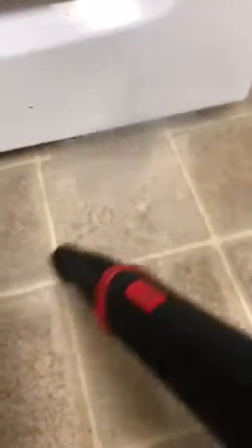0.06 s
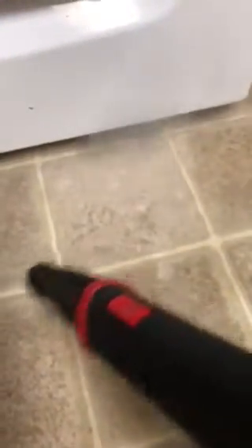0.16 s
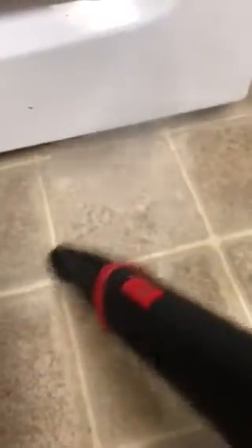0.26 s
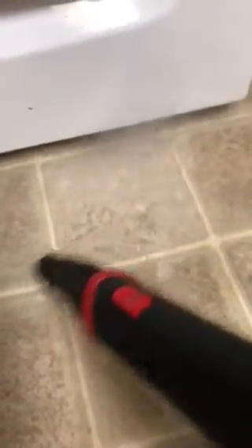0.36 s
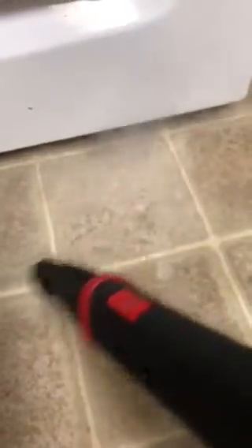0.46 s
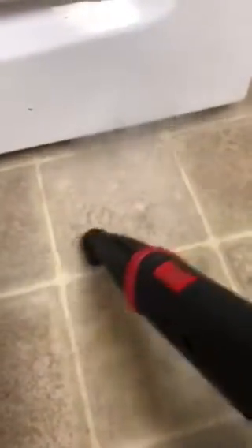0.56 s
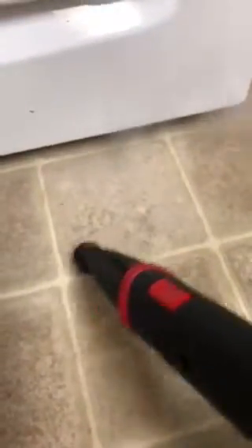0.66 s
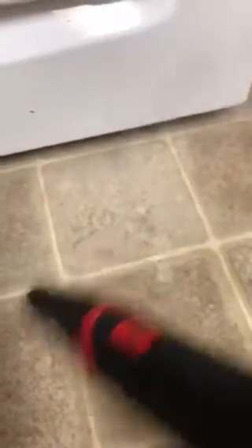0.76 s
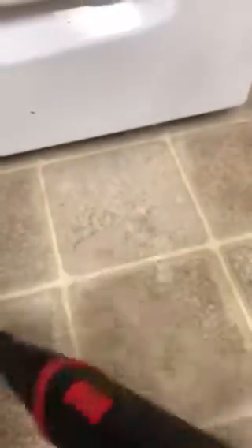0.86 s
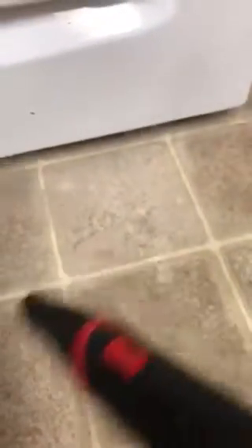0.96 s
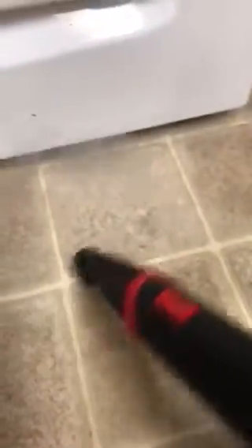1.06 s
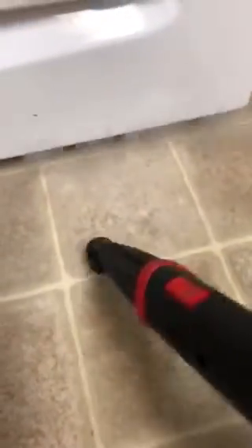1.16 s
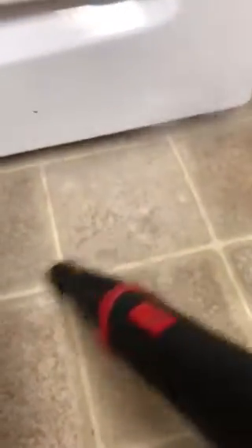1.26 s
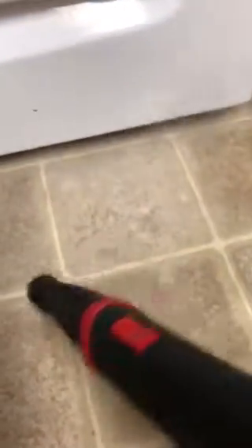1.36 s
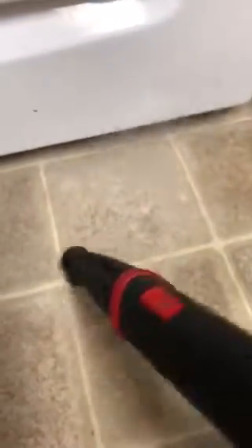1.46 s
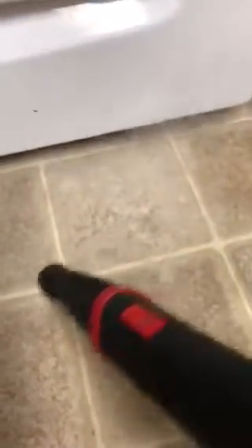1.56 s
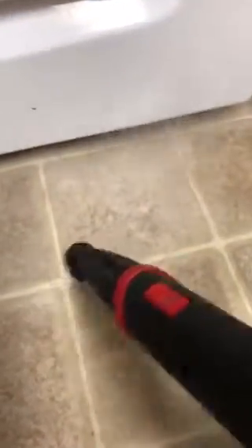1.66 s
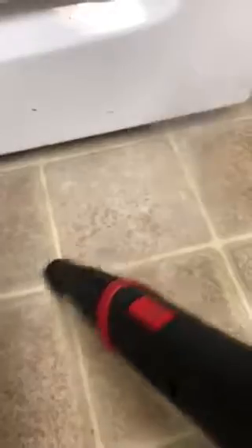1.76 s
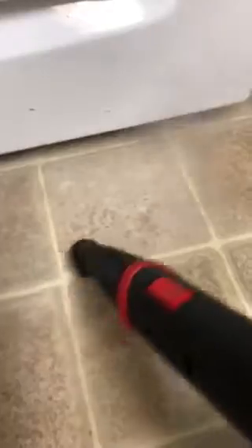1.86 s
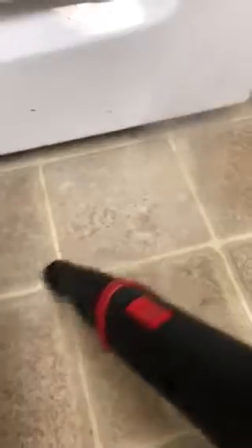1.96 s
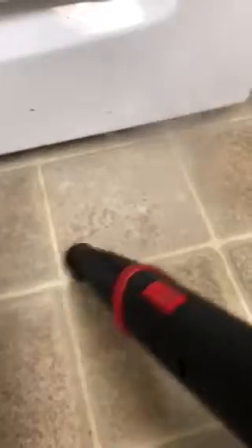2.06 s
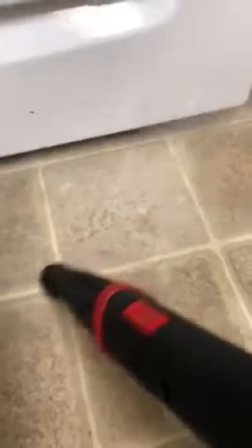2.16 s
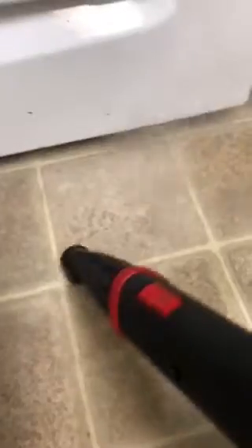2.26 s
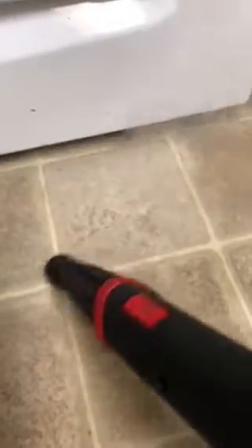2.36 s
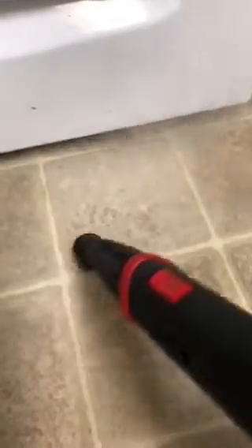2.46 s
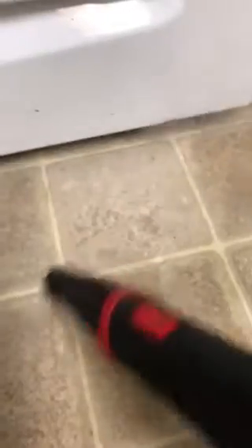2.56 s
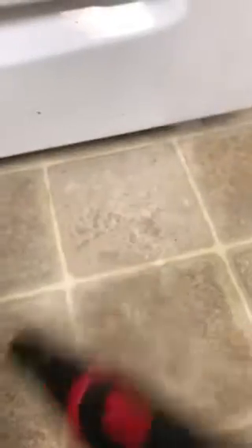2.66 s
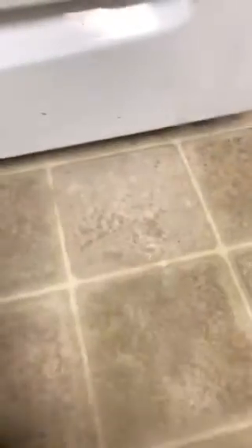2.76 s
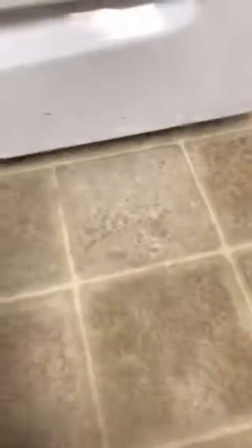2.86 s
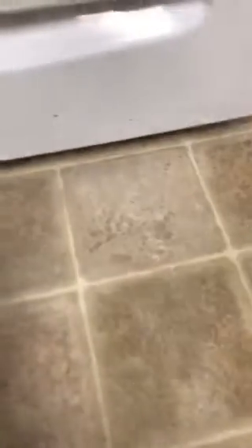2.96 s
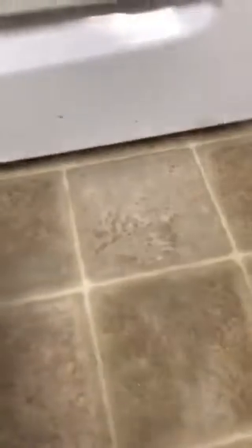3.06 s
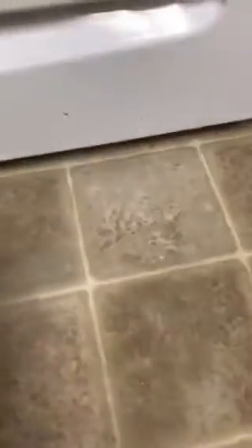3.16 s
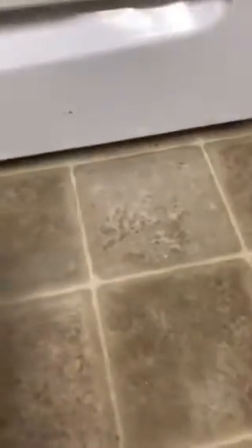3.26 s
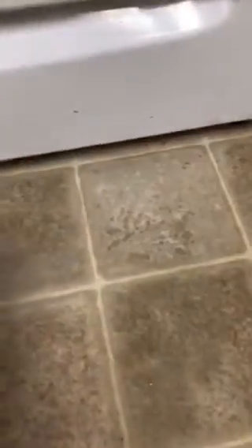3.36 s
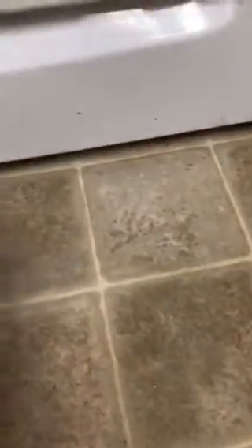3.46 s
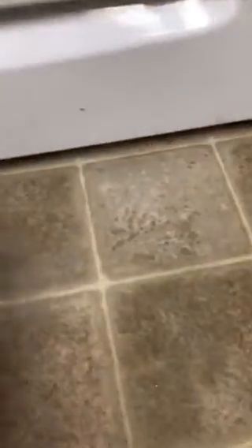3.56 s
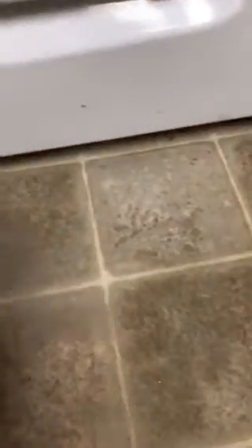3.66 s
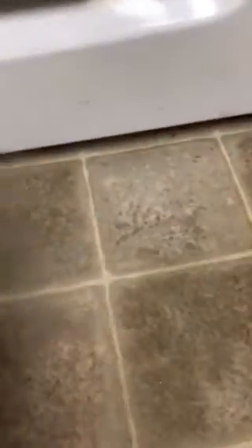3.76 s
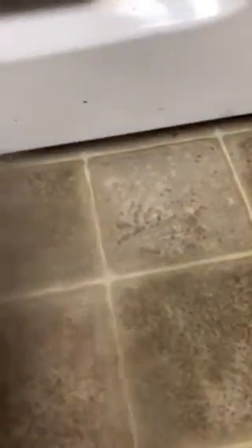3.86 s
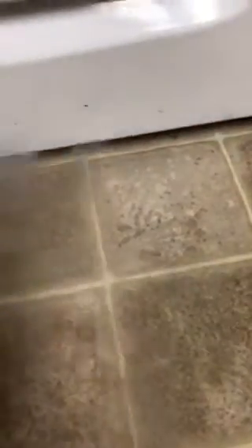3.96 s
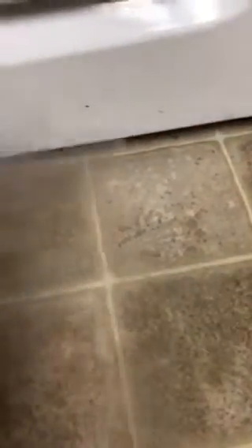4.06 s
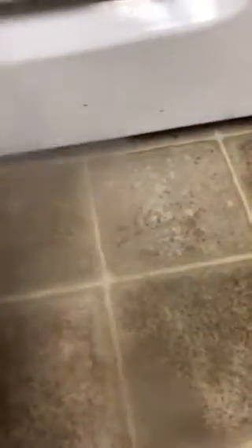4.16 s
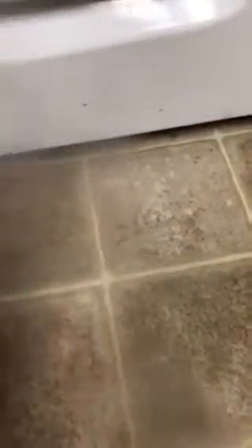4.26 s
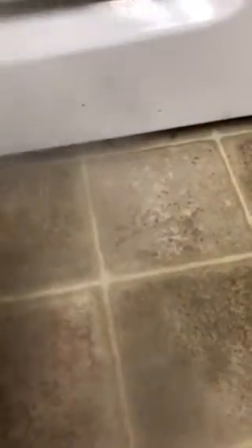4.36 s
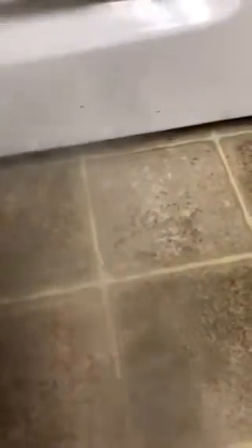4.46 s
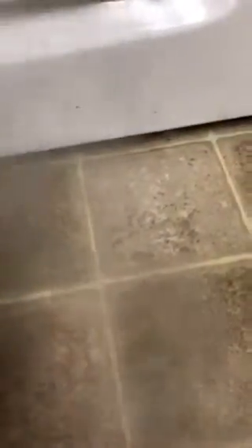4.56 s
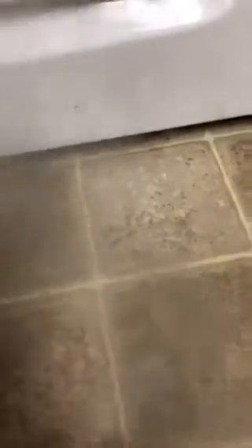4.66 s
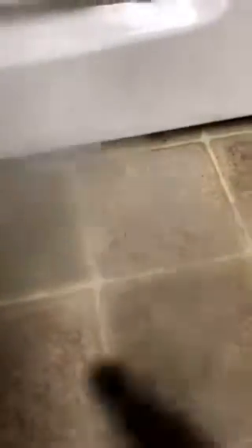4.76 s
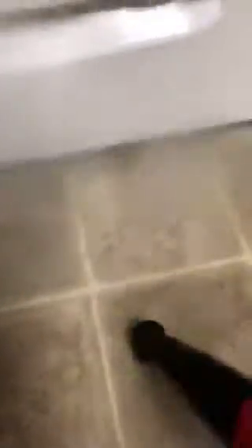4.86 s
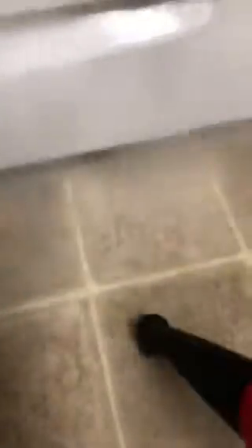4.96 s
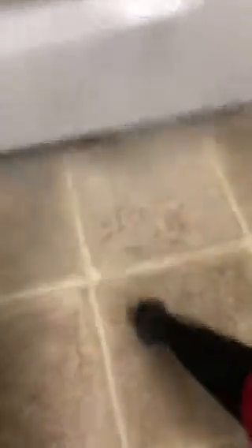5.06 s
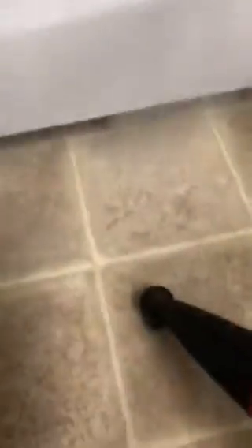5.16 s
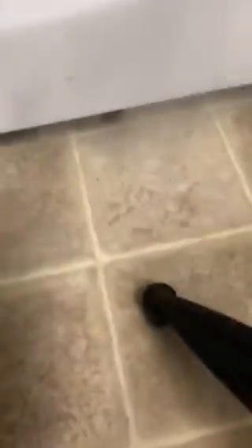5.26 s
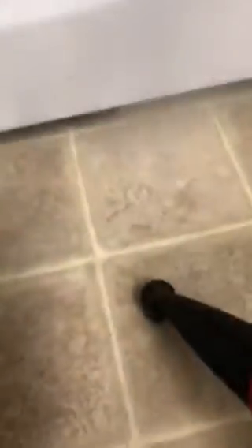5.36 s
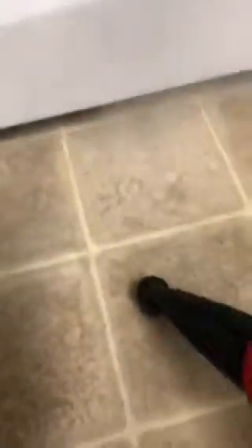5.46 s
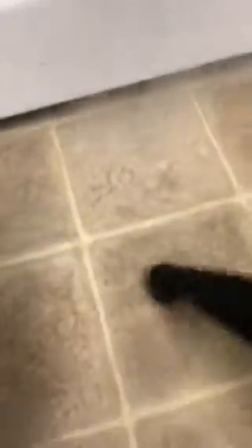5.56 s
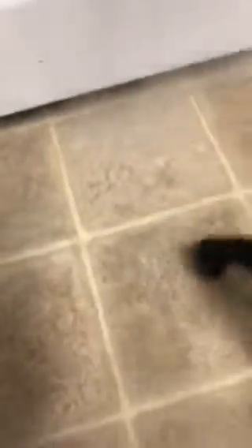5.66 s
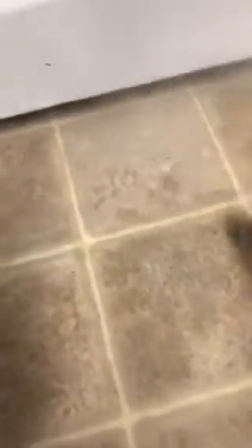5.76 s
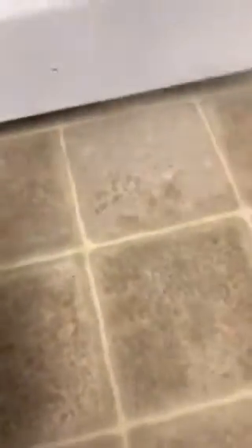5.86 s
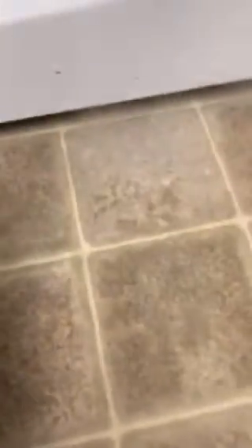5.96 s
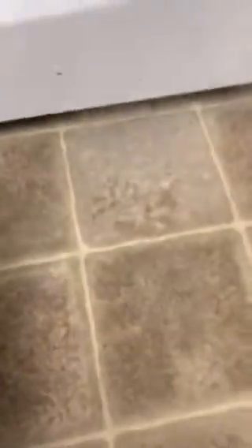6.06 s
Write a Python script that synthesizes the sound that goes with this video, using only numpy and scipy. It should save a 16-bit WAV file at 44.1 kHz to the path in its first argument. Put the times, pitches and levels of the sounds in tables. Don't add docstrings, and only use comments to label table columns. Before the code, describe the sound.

A handheld steam cleaner is already running, about half a metre from a phone microphone, in a small hard room with a tiled floor. Its loud, sharp hiss is strongest around 4 to 8 kHz, grainy with spitting droplets, with a slightly hollow, sliding comb colour from tile reflections. From 0 to 2.6 s it stays strong, with brief tiny dips as the wrist flicks; around 1.4 to 1.7 s it turns fuller, with a faint breathy resonance from the gap beneath the appliance. Near 2.7 s it swells, then drops back as the nozzle is lifted aside. From 3 to 4.7 s it is softer, with more pronounced fluttering dips. It surges back by 4.95 s and holds strong until about 5.7 s, then thins and rapidly dies away by 6.1 s. Quiet low wind-like buffeting and very faint mains hum sit underneath.

```python
import sys
import numpy as np
from scipy import signal
from scipy.fft import rfft, irfft, next_fast_len
from scipy.io import wavfile
from scipy.ndimage import uniform_filter1d, map_coordinates

SR = 44100
rng = np.random.default_rng(int(sys.argv[2]) if len(sys.argv) > 2 else 0)


def log_audio(samples):
    frames = np.atleast_2d(samples).T
    limited = np.clip(frames, -1, 1)
    pcm = np.round(limited * 32767).astype(np.int16)
    wavfile.write(sys.argv[1], SR, pcm)


def boost_factor(decibels):
    exponent = np.asarray(decibels, float) / 20
    return 10 ** exponent


N = 269653
TIME = np.arange(N) / SR
SIZE = next_fast_len(N, True)
BINS_HZ = np.fft.rfftfreq(SIZE, 1 / SR) + 1e-3

# start t/s, length t/s, dip level/dB
WAGS = [(.007, .021, 4), (0.228, 0.033, 3.5), (0.446, 0.022, 6), (0.762, 0.073, 1.5), (1.194, 0.024, 1),
        (1.323, 0.036, 2.5), (1.379, 0.026, 2.2), (1.612, 0.02, 3.7), (1.8, 0.026, 3), (1.978, 0.044, 3),
        (2.191, 0.019, 3.8), (2.316, 0.025, 1.5), (2.407, 0.047, 4.5), (2.602, 0.07, 3), (3.064, 0.15, 2),
        (3.428, 0.096, 5), (3.688, 0.089, 7), (3.912, 0.074, 7), (4.125, 0.079, 5.5), (4.225, 0.055, 2.5),
        (4.406, 0.06, 2), (4.314, 0.072, 6), (4.518, 0.064, 7), (4.61, 0.065, 1.5), (5.763, .028, 1.5),
        (6.009, 0.047, 0.5)]
# t/s, level/dB, aim at the gap [-1..1], fullness level/dB, treble beam level/dB
JET_AIM = [(0, -16, .2, -1, -0.5), (.75, -15.5, -0.14, -4.5, 1.5), (1.02, -15.5, 0.056, 2, -6.5),
           (1.28, -16.5, 0.16, -0.5, 2), (1.41, -17.5, 0.98, 5, -5), (1.72, -17, 0.75, 3, -2),
           (2.57, -15.5, -0.25, -3, 1), (2.71, -14, 0, -4.5, -9), (2.8, -18.5, -1.1, 2.5, 1.5),
           (3.3, -19, -0.15, 3.5, -1), (4.68, -20.5, -0.61, 2.5, 4), (4.82, -19, -.7, 5.5, 7.5),
           (4.95, -16, -0.8, -0.5, -2), (5.69, -15, 0.059, -2.5, -3), (5.81, -17, 0.34, -13, -2),
           (5.87, -16.5, -0.53, -15.5, -2.5), (5.96, -20.5, -1, -13, 0.5), (6.11, -27, -0.078, -10.5, -11)]
# f/Hz, level/dB per Hz
JET_COLOUR = [(290, -29), (500, -20.5), (537, -20), (781, -25), (1100, -18), (1650, -14), (1960, -13.5),
              (3070, -7.5), (4270, -2.5), (5000, -1.5), (5780, -1.5), (7600, -2.5), (10100, -5),
              (14500, -5), (15600, -5)]
AIM_HZ = [800, 1700, 3100, 4400, 6500, 10500, 14500]
# t/s, extra delay/ms, strength [0-1]
WAND_ECHO = [(0, .18, .12), (2.6, .18, .12), (3.0, .2, .05), (4.65, .18, .06), (4.85, .17, .26),
             (5.6, .165, .22), (5.67, .08, .1), (5.7, .085, .4), (5.755, .125, .33), (5.83, .25, .22),
             (5.9, .3, .15), (6.12, .35, .08)]
# t/s, extra delay by the tiles/ms, extra delay by a second bounce/ms, # second
HAND = [(0, .49, .86, .15, .35), (.55, .49, .86, .15, .35), (.7, .44, .87, .16, .3),
        (.9, .66, .96, .08, .2), (.98, .7, 1.0, .05, .15), (1.16, .485, .9, .14, .35),
        (1.26, .455, .88, .19, .55), (1.44, .52, .87, .19, .55), (1.56, .475, .87, .19, .55),
        (2.6, .465, .88, .2, .6), (2.68, .54, 1.1, .05, .3), (2.835, .95, 1.7, .07, .6),
        (3.28, 1.1, 2.0, .05, .9), (4.66, 1.06, 2.0, .1, .75), (4.94, .713, 1.52, .14, .4),
        (5.43, .715, 1.52, .13, .4), (5.78, .84, 1.65, .13, .3), (5.89, .63, 1.45, .08, .6)]
# extra delay/ms,
# strength [0-1]
TILE_MIRROR = [
    (.55, .36),
    (.72, .42),
    (.85, .32),
    (1.1, .19),
]
# t/s, level/dB
DRAUGHT = [(0, -46), (.25, -39.5), (.98, -41), (1.05, -49), (2.3, -44.5), (2.6, -38), (2.78, -50),
           (2.9, -43.5), (3.4, -42.5), (3.6, -41.5), (4.5, -41), (4.7, -43), (5.3, -46), (5.42, -44),
           (5.77, -36), (5.89, -56), (6.11, -50)]
# f/Hz, level/dB per Hz
DRAUGHT_COLOUR = [(15, -43), (25, -44), (54, -2.5), (81, 1.5), (292, 0.5), (479, -4.5), (533, -4),
                  (708, -5.5), (900, -4), (1170, -12), (1980, -120)]
# f/Hz, level/dB
HUM = [(300, -61), (360, -61.5), (540, -55), (600, -62)]
# t/s, low f/Hz, high f/Hz, level/dB
SPLITS = [(.571, 11000, 12400, -32), (1.964, 5200, 6320, -29), (1.964, 13100, 14500, -30),
          (3.055, 6900, 8300, -34), (3.264, 11700, 13800, -33), (4.1, 9000, 10400, -36),
          (5.749, 14500, 15700, -30)]

WAG_FALL_S, WAG_RISE_S, WAG_SETTLE_S = 0.0039, 0.011, 0.073
REACH_LATE_S, REACH_WIDTH_S, REACH_MS, REACH_MID_DB = .03, .04, .075, 3.5
DIP_MAIN, DIP_LOW, DIP_MID, DIP_TOP, SETTLE_TOP, DIP_DRAUGHT = 1.2, .75, .75, .7, .5, 2.2
DRAUGHT_KEEPS_DB = 4
LOW_DB, LOW_GAP_DB, LOW_PER_FULL = -2, 6, 0.42
FLICKER_DB, BILLOW_DB = .8, 1.1
ECHO_TOP_HZ, ECHO_LIFT = 9000, 1.25
ECHO_LOW_HZ, ECHO_LOW_SHARE = 3600, .45
CUPBOARD_MS, CUPBOARD_STRENGTH = 2.0, .06
ROOM_T60_S, ROOM_DB = 0.17, -12.5
GAP_HZ, GAP_WIDTH_HZ, GAP_DB, GAP_AIM_DB = 1643, 260, -46, 13.5
PORT_HZ, PORT_WIDTH_HZ, PORT_LIFT = 14300, 1900, .55
CEILING, TOP_HZ = .85, 15725


def curves(table):
    s, *columns = np.transpose(table)
    return [np.interp(TIME, s, column) for column in columns]


def unit(x):
    return x / np.sqrt(np.mean(x ** 2))


def walk(rate):
    hold = max(int(SR / rate), 2)
    levels = np.repeat(rng.standard_normal(N // hold + 1), hold)
    slewed = uniform_filter1d(uniform_filter1d(levels, hold), hold)
    return unit(slewed[:N])


def filtered(x, gain):
    return irfft(rfft(x, SIZE) * gain, SIZE)[:N]


def bands(x, colour, centres_hz):
    hz, db = np.transpose(colour)
    log_hz = np.log(BINS_HZ)
    x = unit(filtered(x, boost_factor(np.interp(log_hz, np.log(hz), db))))
    return [filtered(x, np.interp(log_hz, np.log(centres_hz), peak)) for peak in np.eye(len(centres_hz))]


def wags():
    t = TIME[::32]
    dip = settle = reach = 0
    for s, length, db in WAGS:
        fall = .5 + .5 * np.tanh((t - s) / WAG_FALL_S)
        after = t - s - length
        rise = .5 - .5 * np.tanh(after / WAG_RISE_S)
        dip = dip - db * fall * rise
        settle = settle - db * fall * np.exp(-np.maximum(after, 0) / WAG_SETTLE_S)
        reach = reach + min(db / 5, 1) * np.exp(-.5 * ((after - REACH_LATE_S) / REACH_WIDTH_S) ** 2)
    return [np.interp(TIME, t, trace) for trace in (dip, settle, reach)]


def jet(dip, settle, reach):
    spat = rng.random(N) < 900 / SR
    droplets = spat * rng.standard_normal(N) * boost_factor(1.83 * rng.exponential(size=N))
    turbulence = rng.standard_normal(N) * boost_factor(0.99 * walk(300) + .5 * walk(40))
    steam = turbulence + boost_factor(-9.0) * unit(droplets)

    flow_db, at_gap, full_db, beam_db = curves(JET_AIM)
    low = LOW_DB + LOW_GAP_DB * np.maximum(at_gap, 0) + LOW_PER_FULL * full_db + DIP_LOW * dip
    mid = full_db + DIP_MID * dip + REACH_MID_DB * reach
    main = DIP_MAIN * dip
    top = beam_db + DIP_TOP * dip + SETTLE_TOP * settle
    aim_db = np.array([1.26 * low, low, mid, 0.62 * mid + 0.77 * main, main, 0.18 * top + 0.57 * main, top])

    centres_hz = np.geomspace(600, 15000, num=16)
    out = 0
    for hz, band in zip(centres_hz, bands(steam, JET_COLOUR, centres_hz)):
        share = np.array([np.interp(np.log(hz), np.log(AIM_HZ), peak) for peak in np.eye(len(AIM_HZ))])
        out = out + band * boost_factor(share @ aim_db + FLICKER_DB * walk(9))
    return out * boost_factor(flow_db + 2.0)


def echo(x, ms, strength):
    return strength * map_coordinates(x, [np.arange(N) - ms * SR / 1000], order=3, mode="mirror")


def reflections(hiss, reach):
    tile_ms, bounce_ms, bounce_strength, in_step = curves(HAND)
    tile_ms = tile_ms + REACH_MS * reach
    dull = filtered(hiss, 1 / (1 + (BINS_HZ / ECHO_TOP_HZ) ** 8))
    mirrored = dull + in_step * (hiss - dull)
    mirrored = filtered(mirrored, 1 - (1 - ECHO_LOW_SHARE) / (1 + (BINS_HZ / ECHO_LOW_HZ) ** 8))
    mirrored = ECHO_LIFT * mirrored * boost_factor(BILLOW_DB * walk(9.2))
    wand = echo(hiss, *curves(WAND_ECHO))
    tiles = echo(mirrored, tile_ms, np.interp(tile_ms, *np.transpose(TILE_MIRROR)))
    bounce = echo(mirrored, bounce_ms, bounce_strength)
    cupboard = echo(mirrored, CUPBOARD_MS, CUPBOARD_STRENGTH)
    return wand + tiles + bounce + cupboard


def room(x):
    t = TIME[:SR // 3]
    tails = rng.standard_normal((4, len(t))) * boost_factor(-60 * t / ROOM_T60_S) * (t > .004)
    wet = sum(signal.oaconvolve(x * walk(5.025), tail)[:N] for tail in tails)
    return boost_factor(ROOM_DB) * wet / np.sqrt(np.sum(tails ** 2))


def gap():
    resonance = 1 / (1 + (2 * (BINS_HZ - GAP_HZ) / GAP_WIDTH_HZ) ** 2)
    ring = filtered(rng.standard_normal(N), resonance)
    at_gap = curves(JET_AIM)[1]
    return unit(ring) * boost_factor(GAP_DB + GAP_AIM_DB * at_gap + 1.6 * walk(12))


def draught(dip):
    parts = bands(rng.standard_normal(N), DRAUGHT_COLOUR, np.geomspace(40, 700, num=5))
    flow_db = curves(DRAUGHT)[0] + DIP_DRAUGHT * np.minimum(dip + DRAUGHT_KEEPS_DB, 0)
    buffet_db = 2.05 * walk(16)
    mean_db = flow_db.mean()
    out = 0
    for part, swing in zip(parts, np.linspace(1.5, .7, num=5)):
        lumps_db = 0.74 * walk(7.4)
        out = out + part * boost_factor(mean_db + swing * (flow_db - mean_db) + buffet_db + lumps_db)
    return out


def hum():
    out = 0
    for hz, db in HUM:
        out = out + np.sqrt(2) * boost_factor(db + 0.5 * walk(4.3)) * np.sin(2 * np.pi * hz * TIME)
    return out


def scene():
    dip, settle, reach = wags()
    hiss = jet(dip, settle, reach)
    near = hiss + reflections(hiss, reach)
    return np.tile(near + room(hiss) + gap() + draught(dip) + hum(), (2, 1))


def band_limit(x):
    return signal.sosfilt(signal.butter(12, 17020, fs=SR, output="sos"), x)


def record(dry):
    port = 1 + PORT_LIFT / (1 + (2 * (BINS_HZ - PORT_HZ) / PORT_WIDTH_HZ) ** 2)
    rounded = CEILING * np.tanh(filtered(dry[0], port) / CEILING)
    mid = filtered(rounded, BINS_HZ < TOP_HZ)
    side = 0
    for s, low_hz, high_hz, db in SPLITS:
        window = np.clip((.022 - np.abs(TIME - s)) / 0.011, 0, 1) ** 2
        burst = rng.standard_normal(N) * window
        band = (BINS_HZ > low_hz) * (BINS_HZ < min(high_hz, TOP_HZ))
        side = side + boost_factor(db + 11.5) * filtered(burst, band)
    return band_limit(np.array([mid + side, mid - side]))


dry = scene()
out = record(dry)
log_audio(out)
```